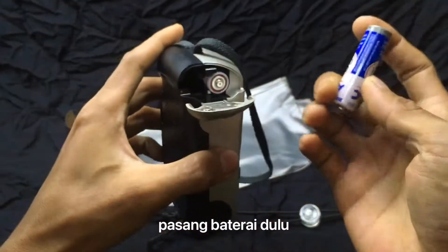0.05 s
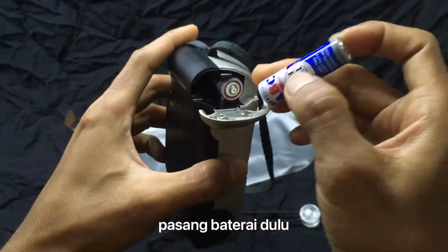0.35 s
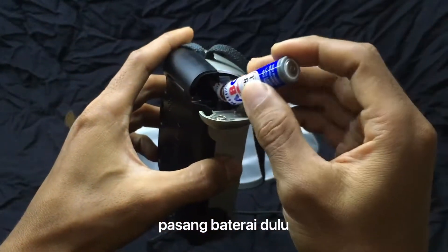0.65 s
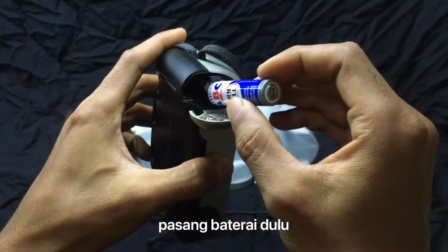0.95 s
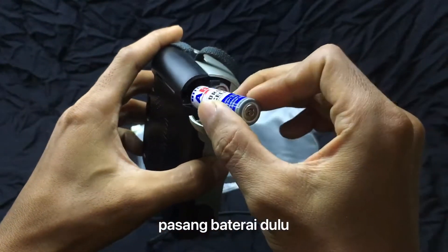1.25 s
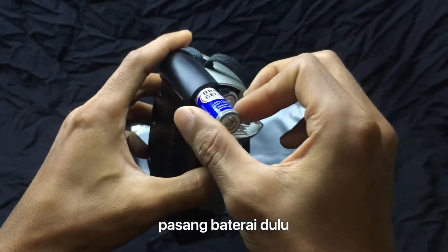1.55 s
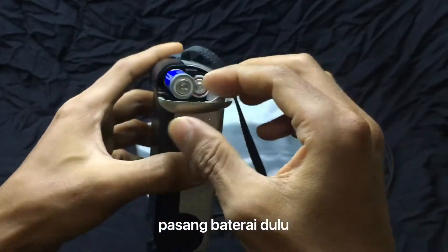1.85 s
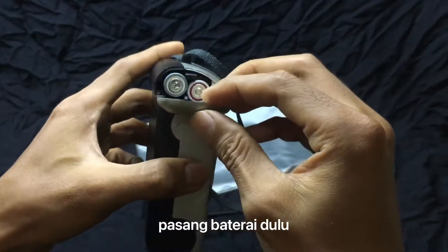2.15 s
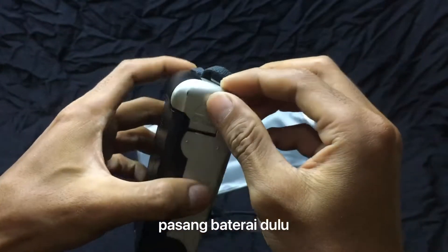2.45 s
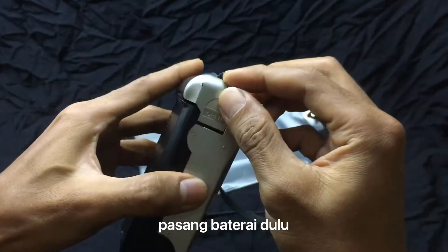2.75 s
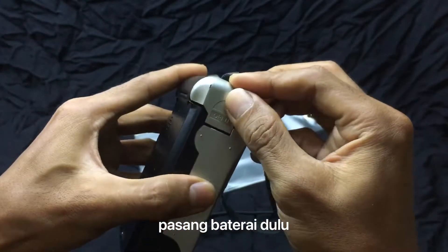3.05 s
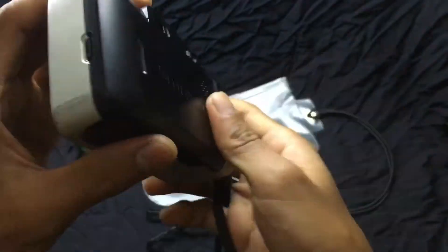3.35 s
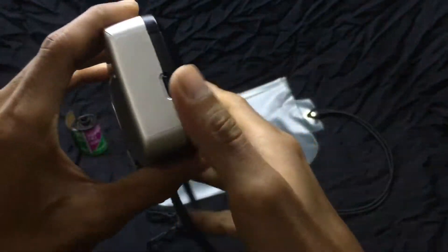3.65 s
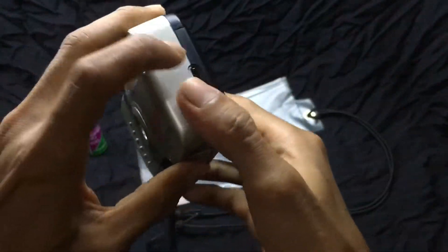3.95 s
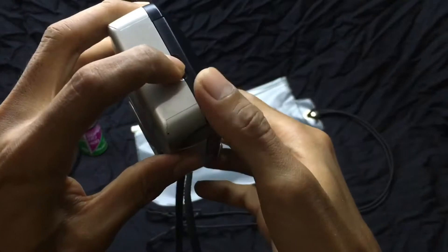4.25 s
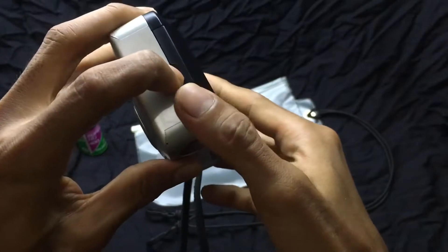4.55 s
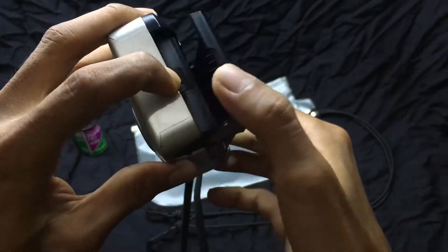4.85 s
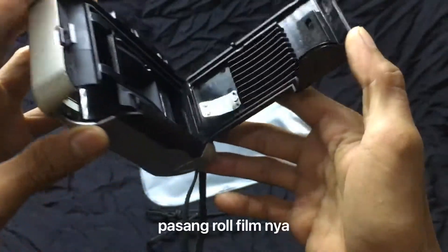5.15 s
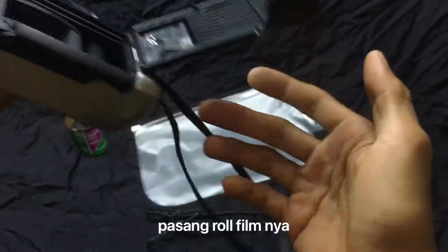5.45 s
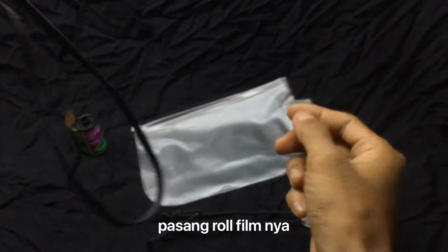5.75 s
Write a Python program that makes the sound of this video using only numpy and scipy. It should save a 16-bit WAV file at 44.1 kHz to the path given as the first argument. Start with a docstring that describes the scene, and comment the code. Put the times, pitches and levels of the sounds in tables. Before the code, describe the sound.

In a small room with a steady low hum and faint hiss, hands work on a hollow plastic camera right by the microphone. Irregular ticks and short rubs come first as a battery slides in and pings against its contact. The lid then closes with a crisp snap. Fingers bump and shift on the shell with softer knocks, the back latch clicks open, and a couple of light ticks finish.

```python
"""A plastic film camera, handled close to the microphone: a battery is fed in, its lid snaps shut,
and the back is unlatched and swung open. Each contact ticks and rings the hollow shell; in between,
parts and fingers rub and thin metal pings. Nearby surfaces and the walls of a small room answer.
Behind it all a machine hums over a low drone and faint hiss."""
import sys
import numpy as np
from scipy import signal
from scipy.fft import rfft, irfft, next_fast_len
from scipy.io import wavfile
from scipy.ndimage import uniform_filter1d

SR = 44100
rng = np.random.default_rng(int(sys.argv[2]) if len(sys.argv) > 2 else 0)


def inscribe(sig):
    """Save sig as 16-bit PCM at rate SR to the path in sys.argv[1].

    A 1-D sig is mono; a 2-D sig holds one channel per row.
    Samples are clipped to [-1, 1] before scaling.
    """
    pcm = np.round(np.clip(np.atleast_2d(sig).T, -1, 1) * 32767)
    wavfile.write(sys.argv[1], SR, pcm.astype(np.int16))


N = 264600
T = np.arange(N) / SR
RING = T[:SR // 10]  # time axis of one contact [s]


# Blows close to the microphone: battery in, lid pressed down, camera turned over, back opened.
# (time [s], knock level [dB], knock centre [Hz], knock width [octaves],
#  tick level [dB], tick tilt [dB/octave])
CONTACTS = [ (.5699, -47, 1400, 0.5, -45.5, 1), (.577, -45, 1210, .45, -50.5, -9),
            (.666, -51.5, 1170, 0.97, -59.5, -0.5), (0.7485, -41, 1200, 0.58, -48.5, 2),
            (.881, -68, 1300, 1.2, -62, -3), (1.1901, -39.5, 1250, 1.06, -50.5, 4.5),
            (1.3064, -34, 960, 1.11, -54, 3), (1.3801, -42.5, 1040, 1.1, -49, -2),
            (1.4268, -48.5, 1160, 1.5, -59.5, 4), (1.45, -49.5, 1080, 0.57, -68, -1),
            (1.4927, -44, 1400, 0.62, -50.5, -7), (1.617, -53, 1210, 0.66, -56, -5),
            (1.845, -45.5, 1100, 1, -59, -2), (1.895, -43.5, 1180, 1.5, -47.5, 5),
            (1.9035, -37, 1170, .58, -49.5, -9), (1.922, -42.5, 1040, .65, -52, -6),
            (2.1705, -54.5, 1200, .6, -78, -5), (2.384, -62, 1300, 1.1, -61.5, -3),
            (2.429, -56, 1480, 1.3, -50, -0.5), (2.5083, -53, 1410, 0.91, -48.5, -1),
            (2.9993, -37.5, 1270, 0.53, -41.5, -1), (3.225, -50.5, 785, 1.7, -64, -13),
            (3.2932, -51, 750, 0.66, -58, -1), (3.297, -34.5, 740, 1.12, -57, -1),
            (3.331, -45, 1010, 1.2, -57.5, 1), (3.607, -49, 1070, 0.68, -56.5, -7),
            (3.81, -42, 830, 1.4, -59, -0.5), (4.0602, -59, 1150, 1, -59, -4.5),
            (4.333, -38.5, 830, 0.59, -58.5, -9), (4.405, -48.5, 730, .4, -76, -5),
            (4.4963, -51.5, 640, .7, -64.5, -14), (4.654, -49, 850, 1.16, -60.5, -1),
            (4.708, -45, 1144, 1.7, -55.5, -5), (4.8205, -50.5, 1990, .5, -51, -1.5),
            (4.865, -53, 1490, 1.2, -57, -6), (4.871, -44.5, 1510, 1.1, -48, -1.5),
            (4.877, -43, 1200, 1.6, -52.5, 5), (5.2539, -54.5, 1510, 1.3, -44, 5),
            (5.9811, -55, 1304, 1.4, -51.5, 2)]

def contacts():
    """Battery, lid, latch and fingers strike the shell in turn."""
    out = np.zeros(N)
    for s, *blow in CONTACTS:
        add(out, s, contact(*blow))
    return out


# Spectrum of a hard edge striking, heard close up: (frequency [Hz], level [dB])
TICK = [(1000, -48.5), (2200, 1), (3300, 5.5), (4800, -1), (6300, -4), (8600, -2), (10800, -5), (13000, -4),
        (16000, -5)]

def contact(knock_db, centre_hz, octaves, tick_db, tilt_db):
    """An edge ticks and scuffs; a moment later the mass behind it arrives and knocks the shell."""
    hard_hz = 1195  # hard parts knock from here up and scuff in full, soft fingers more briefly
    scuff_s = .0017 * min(centre_hz / hard_hz, 1) ** 1.6
    scuff = np.exp(-RING / scuff_s) * (1 - np.exp(-RING / (.3 * scuff_s)))
    rattle = undb(-9) * np.exp(-RING / .004)
    slips = grit(len(RING), spread=.71) * (scuff + rattle)
    out = burst(colour(slips, TICK, tilt_db), tick_db)
    high_modes = shell(centre_hz=6000 * undb(tilt_db * .41), octaves=1.8, scatter_db=4)
    add(out, 0, burst(high_modes, tick_db - 10.5))
    knock = shell(centre_hz, octaves, scatter_db=2.5)
    add(out, .0003 + .3 * scuff_s, burst(knock, knock_db))
    return out


# Modes of the camera's hollow shell: (frequency [Hz], level [dB], t60 [s])
SHELL_MODES = [(416, 9.5, 0.03), (584, 4.5, 0.03), (732, 9, 0.016), (937, -1, .032), (1057, 5, 0.027),
               (1190, -1, .036), (1428, 0.5, .028), (1647, 0, 0.031), (1870, 3, .022), (2223, 2, .032),
               (2555, 0.5, 0.03), (2750, 1, .02), (3134, 3, 0.03), (3590, 0.5, 0.03), (3830, -6, 0.036),
               (5370, -3, 0.03), (6003, 4.5, 0.02), (6560, -2, 0.013), (6520, 0, .02), (8570, -2, .018),
               (9160, 6, 0.015), (12400, -6.5, .016), (14200, -6.5, .016)]

def shell(centre_hz, octaves, scatter_db):
    """The shell rings: softer blows reach lower modes; the spot struck sets their share and phase."""
    hz, db, t60 = np.transpose(SHELL_MODES)[:, :, None]
    share, detune = rng.standard_normal((2, len(SHELL_MODES), 1))
    phase = rng.uniform(0, 2 * np.pi, hz.shape)
    reach = 1 / (1 + (np.log2(hz / centre_hz) / octaves) ** 2) ** 2
    grip = 1 + .0025 * detune  # the hands load the shell a little differently each time
    rise = 1 - np.exp(-(RING * hz) ** 2)  # a mode takes about a cycle to get going
    waves = np.sin(2 * np.pi * hz * grip * RING + phase) * rise * decay(RING, t60)
    return np.sum(undb(db + scatter_db * share) * reach * waves, axis=0)


# Crack of the lid's catch, straight to the microphone: (frequency [Hz], level [dB])
CRACK = [(200, -10.5), (420, -7), (620, -22), (900, -6.5), (1450, -5), (2100, -6.5), (3400, 0), (4800, -5),
         (6600, -1.5), (8600, -1.5), (11000, -6), (13000, -2.5), (16000, -8.5)]
# Modes of the small stiff battery lid: (frequency [Hz], level [dB], t60 [s])
LID_MODES = [(1600, -6.5, .02), (2600, -8.5, 0.016), (3140, -5.5, .016), (3600, -5.5, .018),
             (6100, -3, 0.0092), (6700, -4, 0.00896), (8560, 2.5, 0.0084), (9900, -5, .008)]
SNAP_S = 3.1003

def snap():
    """The catch scrapes over its lip, cracks home and rings the lid and the hollow of the shell."""
    out = np.zeros(N)
    scrape = colour(grit(len(RING), spread=.4) * np.exp(-RING / .0013), CRACK)
    add(out, SNAP_S - .0012, burst(scrape, db=-32))
    crack = colour(bending_pulse(delay_s=.0007, at_hz=7965), CRACK)
    add(out, SNAP_S - .0005, burst(crack, db=-25))
    # the lid's many small modes blur into a short buzz, and a few strong ones stand out
    buzz = colour(grit(len(RING), spread=.13) * np.exp(-RING / .004), CRACK)
    add(out, SNAP_S, burst(buzz, db=-25.5))
    hz, db, t60 = np.transpose(LID_MODES)[:, :, None]
    side = (-1) ** np.arange(len(hz))[:, None]  # neighbouring modes swing opposite ways at the catch
    lid = np.sum(side * undb(db) * np.sin(2 * np.pi * hz * RING) * decay(RING, t60), axis=0)
    add(out, SNAP_S, burst(lid, db=-22))
    add(out, SNAP_S, burst(shell(centre_hz=5500, octaves=3.2, scatter_db=.5), db=-25.5))
    add(out, SNAP_S + .00063, burst(shell(centre_hz=1190, octaves=.55, scatter_db=.5), db=-31))
    # the whole camera takes the jolt
    add(out, SNAP_S, burst(shell(centre_hz=399.8, octaves=.25, scatter_db=2.5), db=-42.5))
    return out


def bending_pulse(delay_s, at_hz):
    """A sharp blow after crossing the plastic: bending waves bring the treble first, the bass last."""
    hz = np.arange(len(RING) // 2 + 1) * SR / len(RING)
    phase_lag = 4 * np.pi * delay_s * np.sqrt(hz * at_hz)
    return irfft(np.exp(-1j * phase_lag), len(RING))


# Parts and fingers sliding on the camera: (start [s], length [s], shell level [dB], hiss level [dB])
RUBS = [(.725, 0.034, -61.5, -74), (0.978, 0.032, -57.5, -67), (1.393, 0.086, -56.5, -75),
        (1.839, 0.068, -56.5, -63.5), (1.892, 0.054, -49, -62.5), (3.331, 0.072, -71, -65.5),
        (3.499, 0.034, -85, -64.5), (3.718, 0.1, -69, -70), (4.711, 0.059, -68, -62), (4.91, .1, -77, -69),
        (5.281, 0.037, -63, -61.5)]

def rubs():
    """Sliding faces catch and slip, hissing and murmuring through the shell."""
    out = np.zeros(N)
    for s, length, shell_db, hiss_db in RUBS:
        size = int(length * SR)
        catch = undb(2.5 * smooth_noise(SR // 5, window=150))[:size]
        slips = grit(size, spread=.55) * catch * signal.windows.tukey(size, .7)
        body = signal.fftconvolve(slips, shell(centre_hz=1160, octaves=1.3, scatter_db=-1))
        add(out, s, body * undb(shell_db) / np.std(body[:size]))
        hiss = unit(colour(slips, TICK, tilt_db=3))
        add(out, s, hiss * undb(hiss_db))
    return out


# Battery contacts and latch spring: (time [s], frequency [Hz], level [dB], rise [s], t60 [s])
PINGS = [(.35, 7200, -74, .012, .07), (.46, 9200, -73, .04, 0.33), (0.88, 7020, -67, .001, .011),
         (1.897, 3633, -46, 0.0029, 0.08), (4.707, 2780, -50, 0.00061, 0.016),
         (4.707, 4400, -58.5, .001, 0.019), (4.8649, 3135, -53, .003, 0.057),
         (5.295, 5040, -64.5, 0.0034, .05)]

def pings():
    """Thin parts ring or squeak when pushed, swelling and dying away on one wavering note."""
    out = np.zeros(N)
    t = T[:SR // 4]
    for s, hz, db, rise_s, t60 in PINGS:
        waver = 1 + .009 * smooth_noise(len(t), window=200)
        note = np.sin(2 * np.pi * np.cumsum(hz * waver) / SR)
        envelope = (1 - np.exp(-(t / rise_s) ** 2)) * decay(t, t60)
        add(out, s, burst(note * envelope, db))
    return out


# Spells of fingers shifting on the camera, faint even this close: (start [s], end [s])
FIDGETS = [(1.201, 2.1), (3.75, 3.9), (4.72, 4.85), (5.9, 5.97)]

def touches(per_s=4):
    """Fingers tap the shell lightly at chance moments while the grip shifts."""
    out = np.zeros(N)
    for start, end in FIDGETS:
        count = max(round((end - start) * per_s), 1)
        for k in range(count):
            s = start + (end - start) * (k + rng.uniform()) / count
            force_db = 1.5 * rng.standard_normal()
            add(out, s, contact(knock_db=force_db - 59, centre_hz=1150, octaves=.7,
                                tick_db=force_db - 64, tilt_db=-1.5))
    return out


# The nearest surfaces, a metre or two away: (delay [s], level [dB])
ECHOES = [(.00557, -18), (0.011, -19)]

def nearby(x):
    """The direct sound reaches the microphone first, then its echoes off the nearest surfaces."""
    out = x.copy()
    for delay_s, db in ECHOES:
        add(out, delay_s, x * undb(db))
    return out


# The snap's power into the room, averaged over all directions: (frequency [Hz], level [dB])
SNAP_POWER = [(250, -6.5), (600, -10), (1100, -0.5), (2200, -1), (3500, -3), (5000, -7.5), (8500, -4),
              (11000, -8.5), (16000, -11)]

def snap_all_round():
    """The snap as the walls receive it: from every side at once, so its peaks and notches even out."""
    out = np.zeros(N)
    pulse = colour(signal.unit_impulse(len(RING)), SNAP_POWER)
    add(out, SNAP_S, burst(pulse, db=-18))
    return out


# The small room around the microphone: (frequency [Hz], t60 [s], level [dB])
ROOM_BANDS = [(297.7, 0.51, -16.5), (1107, 0.32, -14), (3492, 0.38, -15), (7920, 0.41, -19),
              (13070, 0.22, -17)]

def room(x):
    """The walls return a diffuse ring, longest in the bass and shortest in the top treble."""
    t = T[:SR // 2]
    spectrum = rfft(rng.standard_normal(len(t)))
    octave = np.log2(np.maximum(np.arange(len(spectrum)) * SR / len(t), 1))
    hz, t60, db = np.transpose(ROOM_BANDS)
    onset = np.clip(t / .012, 0, 1) ** 2  # the walls answer late
    tail = np.zeros(len(t))
    for band_t60, band_db, pick in zip(t60, db, np.eye(len(hz))):
        band = irfft(spectrum * np.interp(octave, np.log2(hz), pick), len(t))
        fade = decay(t, band_t60) * onset
        tail += band * fade * undb(band_db) / np.sqrt(np.sum(fade ** 2))
    return signal.fftconvolve(x, tail)[:N]


# Tones of the machine and the mains, in the background: (frequency [Hz], level [dB])
HUM_TONES = [(70.0, -43), (81.3, -52.5), (100, -57), (138.6, -53), (141, -54.5), (200, -66), (244, -69.5)]
# Slow rise and fall of the hum at the microphone: (time [s], gain [dB])
HUM_GAIN = [(0, 1.5), (1.2, 1.5), (3.5, -0.9), (4.5, 2), (5.2, -1.5), (6, -5)]

def machine_hum():
    """Machine and mains hold their pitches while the level drifts and wavers a little."""
    phases = rng.uniform(0, 2 * np.pi, len(HUM_TONES))
    tones = sum(np.sqrt(2) * undb(db) * np.sin(2 * np.pi * hz * T + phase)
                for (hz, db), phase in zip(HUM_TONES, phases))
    drift_db = np.interp(T, *np.transpose(HUM_GAIN))
    return tones * undb(drift_db + waver_db())


# Low drone of the room: (frequency [Hz], relative level [dB])
DRONE = [(25, -32), (36, -20.5), (47, 3), (55, 5.5), (66, 0.5), (86, -5), (100, 7.5), (122, 0.5),
         (140, 0.5), (168, -2.5), (205, -7.5), (240, -21.5), (300, -12), (480, -49)]
# Air and hiss behind everything: (frequency [Hz], relative level [dB])
AIR = [(200, 14), (400, 4.5), (900, 2), (1500, 0.5), (2200, -4.5), (3200, -12), (4900, -25), (6000, -20.5),
       (7600, -27.5), (9000, -33.5), (10300, -38), (11700, -17.5), (16000, -35.5)]

def room_tone(crest_s=1.15, rise_db_per_s=3, sink_db_per_s=1):
    """A low drone swells to a crest and slowly sinks under a faint, even hiss."""
    drone = unit(colour(rng.standard_normal(N), DRONE))
    air = unit(colour(rng.standard_normal(N), AIR))
    below_crest_db = np.maximum(rise_db_per_s * (crest_s - T), sink_db_per_s * (T - crest_s))
    return drone * undb(-40.5 - below_crest_db + waver_db()) + air * undb(-56.5)


def waver_db(per_s=5, rms_db=.7):
    """A slow wander in level: random steps, smoothed twice."""
    hold = int(SR / per_s)
    steps = np.repeat(rng.standard_normal(N // hold + 1), hold)
    return rms_db * unit(uniform_filter1d(uniform_filter1d(steps, hold), hold)[:N])


def grit(size, spread):
    """Tiny slips of uneven size between two rough faces."""
    sign, strength = rng.standard_normal((2, size))
    return np.sign(sign) * np.exp(spread * np.clip(strength, -3, 3))


def smooth_noise(size, window):
    """Noise averaged over a window of samples; rms 1."""
    return unit(uniform_filter1d(rng.standard_normal(size), window))


def colour(x, points, tilt_db=0):
    """Causal filter through (Hz, dB) points, tilted per octave; falls 10 dB an octave below them."""
    n = next_fast_len(2 * len(x), True) * 2
    octave = np.log2(np.maximum(np.arange(n // 2 + 1) * SR / n, 1))
    hz, db = np.transpose(points)
    below = np.maximum(np.log2(hz[0]) - octave, 0)
    above = np.maximum(octave - np.log2(hz[0]), 0)
    curve_db = np.interp(octave, np.log2(hz), db) + tilt_db * above - 10 * below
    # folding the cepstrum gives minimum phase
    cepstrum = irfft(curve_db * np.log(10) / 20)
    cepstrum[1:n // 2] *= 2
    cepstrum[n // 2 + 1:] = 0
    return irfft(rfft(x, n) * np.exp(rfft(cepstrum)))[:len(x)]


def decay(t, t60):
    """Fall by 60 dB every t60 seconds."""
    return np.exp(-np.log(1000) * t / t60)


def burst(x, db):
    """Give a short sound the energy of 10 ms at this level."""
    return x * undb(db) / np.sqrt(np.sum(x ** 2) / (SR / 100))


def undb(db):
    """Decibels to gain."""
    return 10 ** (np.asarray(db) / 20)


def unit(x):
    """Scale to rms 1."""
    return x / np.sqrt(np.mean(x ** 2))


def add(out, s, x):
    """Mix x into out from time s."""
    i = int(s * SR)
    out[i:i + len(x)] += x[:len(out) - i]


def scene():
    """One microphone: the camera close up, the small room around it, the hum behind."""
    handling = contacts() + rubs() + pings() + touches()
    close = nearby(handling + snap())
    walls = room(handling + snap_all_round())
    return (close + walls + machine_hum() + room_tone())[None]


def record(dry):
    """The recorder cuts the top steeply."""
    top_hz = 15850
    return signal.sosfilt(signal.ellip(10, .2, 80, top_hz, fs=SR, output="sos"), dry)


dry = scene()
out = record(dry)
inscribe(out)
```